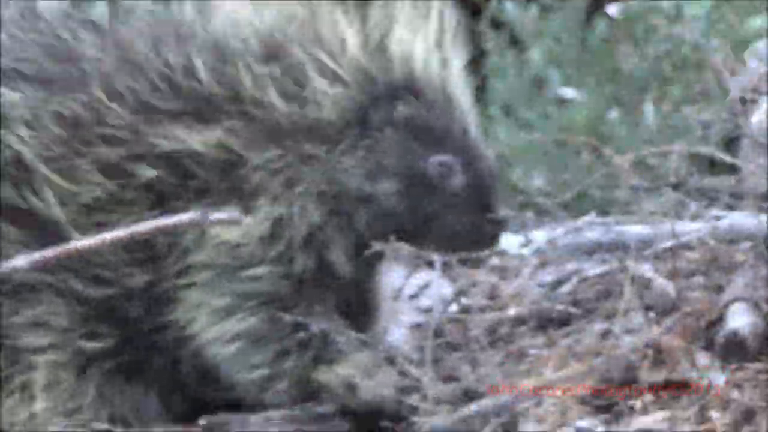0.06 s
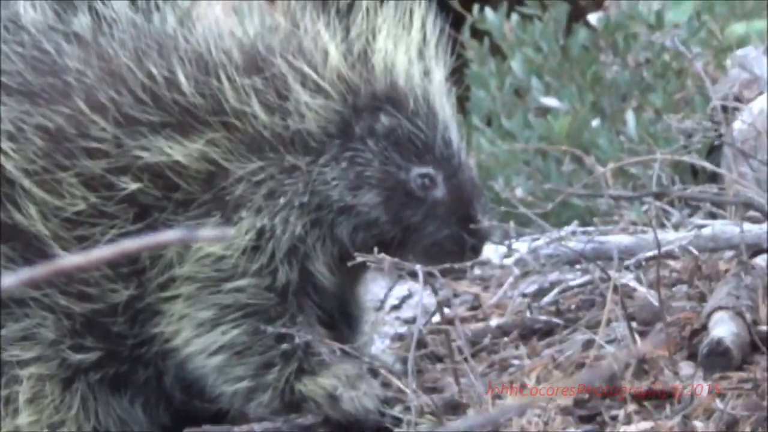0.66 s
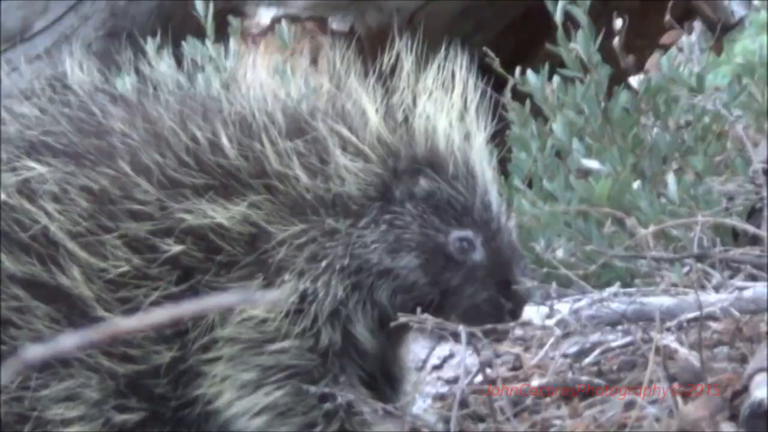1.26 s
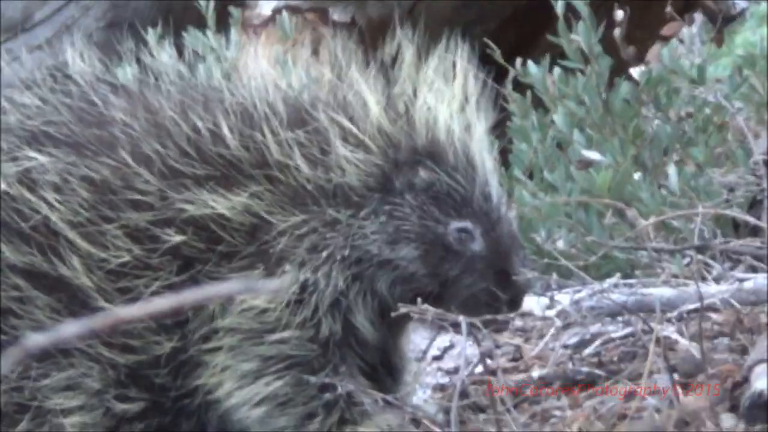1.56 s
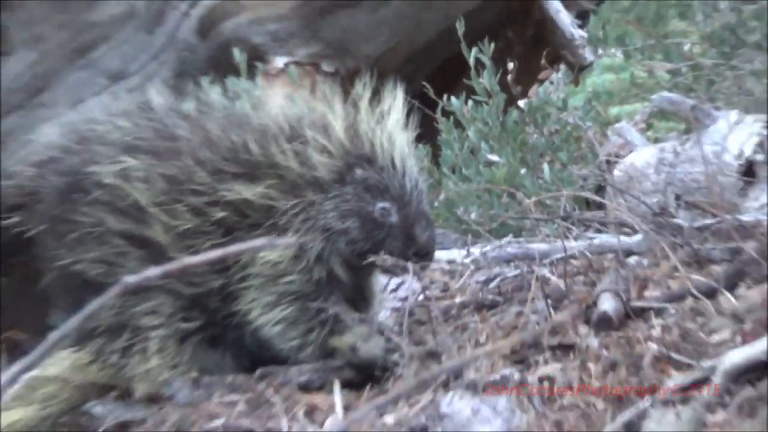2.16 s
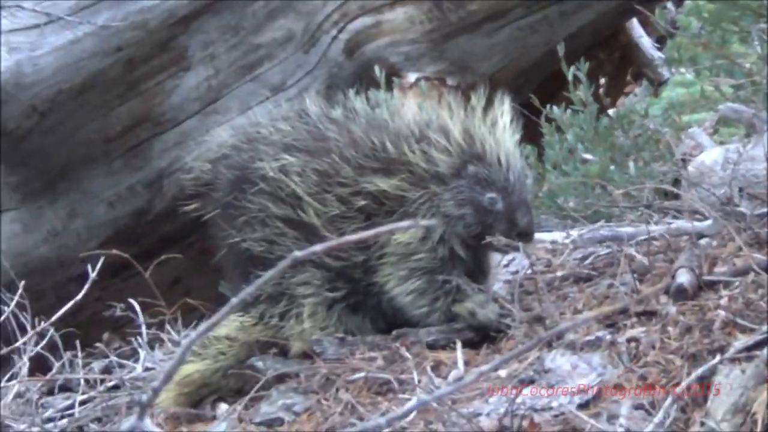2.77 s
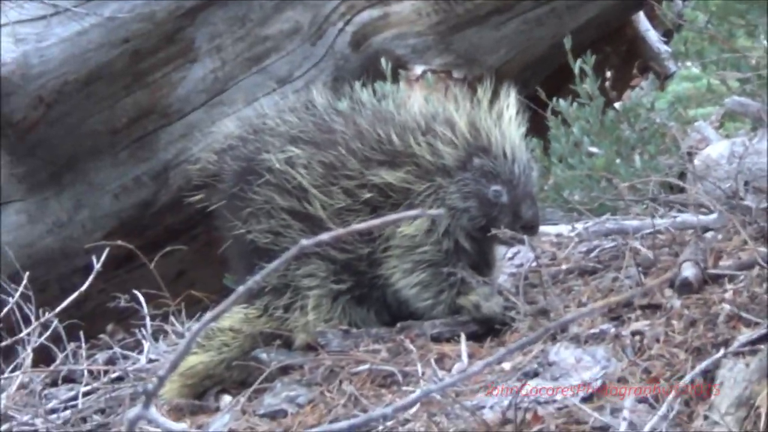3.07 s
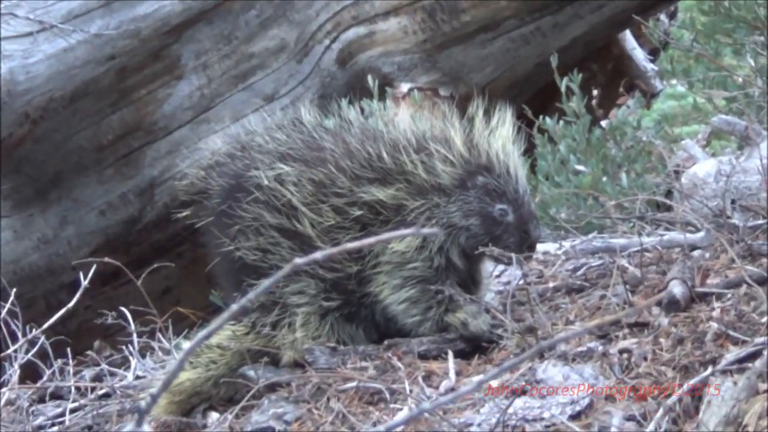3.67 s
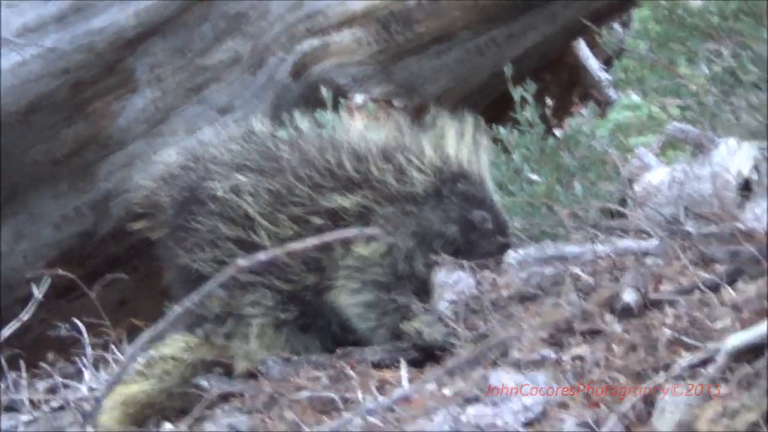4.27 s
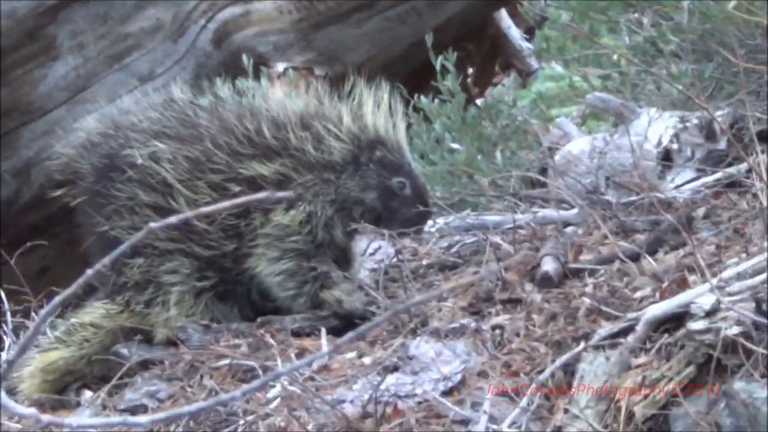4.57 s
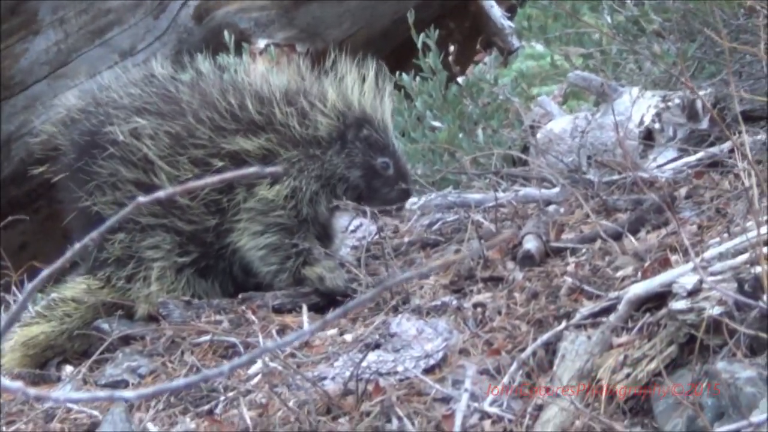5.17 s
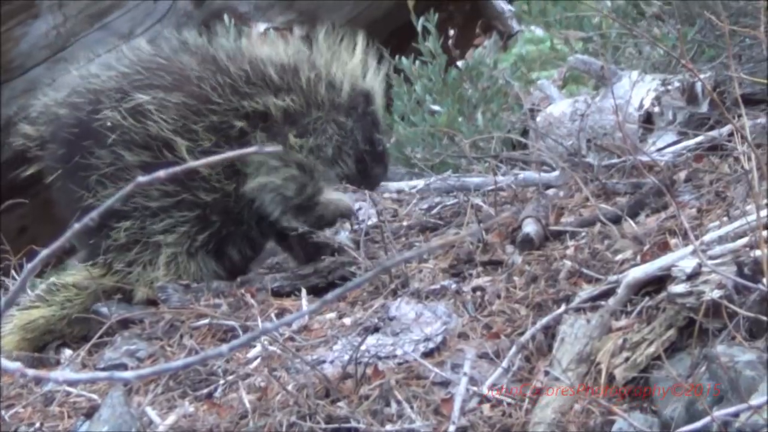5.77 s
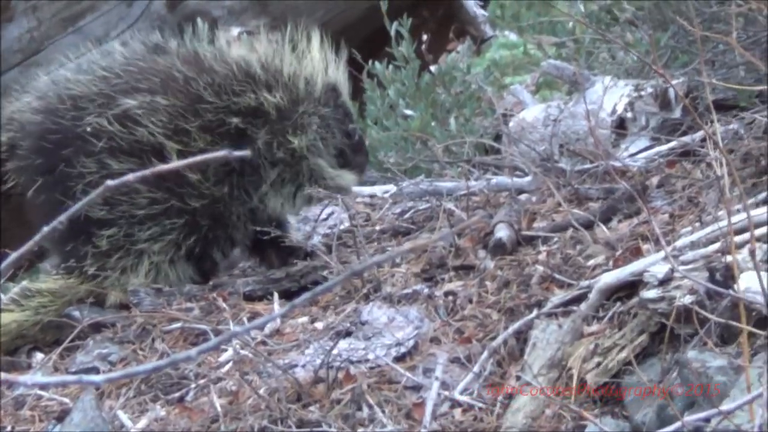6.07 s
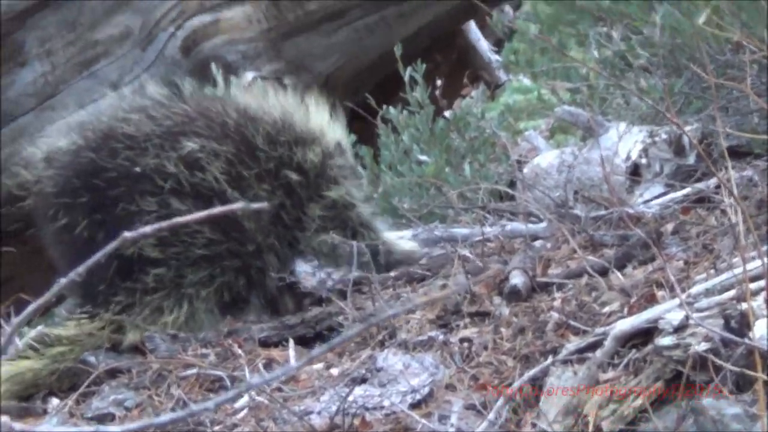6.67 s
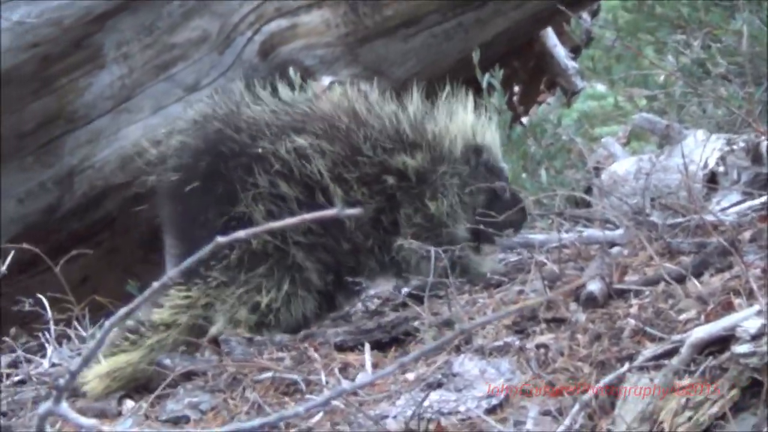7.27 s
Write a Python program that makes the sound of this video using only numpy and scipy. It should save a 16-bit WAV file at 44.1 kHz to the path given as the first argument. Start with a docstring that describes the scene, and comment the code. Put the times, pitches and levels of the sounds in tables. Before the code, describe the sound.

Steady wind in distant trees and a far-off idling engine, with a few faint twig snaps and rustles from a porcupine.

```python
"""A steady rush of wind through far trees, with the low hum and throb of an engine idling a long way off.
A porcupine sits on forest litter: one dry twig snaps at 2.2 s; near the end it shifts its feet,
needles crackle and a few more twigs tick, each a noise burst ringing in wood resonances.
A thin high whine pulses about 13 times a second.
The camera adds hiss; at about 1 s its sound cuts out for half a second."""
import sys
import numpy as np
from scipy import signal
from scipy.fft import irfft
from scipy.io import wavfile

SR = 44100
rng = np.random.default_rng(int(sys.argv[2]) if len(sys.argv) > 2 else 0)


def put_to_file(sound):
    """Save the sound as 16-bit audio at rate SR, in the file named by the first command-line argument."""
    columns = np.atleast_2d(sound).T  # one column per channel
    safe = np.clip(columns, -1, 1)
    whole_steps = np.round(safe * 32767)
    wavfile.write(sys.argv[1], SR, whole_steps.astype(np.int16))


N = 327663
TIME_S = np.arange(N) / SR
SIDES = np.array([[1], [-1]])  # left +, right -

# wind colour: freq_hz, relative_density_db
WIND_SPECTRUM = [(80, -30), (170, -5), (265, -5.5), (400, -3), (540, -1.5), (830, -0.95), (1030, -1.76),
                 (1500, -6), (2200, -10), (3200, -17), (4000, -22), (7400, -31.5), (8600, -38),
                 (10500, -83.5)]
# left-right likeness of the wind: freq_hz, coherence
WIND_COHERENCE = [(100, .997), (300, 0.96), (550, 0.93), (1000, 0.86), (2000, 0.79), (4000, 0.58),
                  (8000, 0.6)]
# wind balance: freq_hz, left_minus_right_db
WIND_BALANCE = [(100, -3), (250, 2), (550, 2.5), (900, 3.0), (1400, 4), (2400, 2.5), (4400, 1), (7500, 0)]
# wind phase between the channels: freq_hz, left_lead_rad
WIND_PHASE = [(100, -0.2), (300, -0.33), (750, -0.76), (1900, -0.99), (3000, -.8), (5000, -.45),
              (7500, -.1)]
# harmonics of the engine cycle: order, relative_level_db
ENGINE_HARMONICS = [(1, -22), (2, -28.5), (3, -7.5), (4, -10), (5, -0.5), (6, -11.5), (7, -13), (9, -15)]
# exhaust rumble colour: freq_hz, relative_density_db
RUMBLE_SPECTRUM = [(20, -27), (36, -23.5), (53, -7.5), (80, -6), (105, 3), (150, -2.5), (200, -6.5),
                   (300, -32.5), (1000, -93)]
# twigs snapping underfoot: start_s, force_db, pitch_hz
TWIG_SNAPS = [(2.216, -26, 3700), (5.779, -39, 10200), (6.502, -38, 9300), (6.558, -42, 10200),
              (6.686, -31, 10000), (6.7455, -30, 9300), (7.089, -39, 10000)]
# dry twig resonances: pitch_ratio, relative_bandwidth, gain_db
TWIG_MODES = [(.82, .13, 0), (.96, 0.15, 2.5), (1.12, .11, 3), (1.27, .1, -8)]
# feet dragging through needles: crest_s, sigma_s, force_db
FOOT_DRAGS = [(6.38, .035, -47.5), (6.76, .04, -53), (7.16, .04, -52)]
# preamplifier hiss colour: freq_hz, relative_density_db
HISS_SPECTRUM = [(3000, -8), (6000, -10.5), (8700, 4), (10500, 1.5), (13000, -2), (16000, -3)]
# tones of the high whine, line scan strongest: freq_hz, relative_level_db
WHINE_TONES = [(7882, -21), (15554.4, -23), (15614.4, -19), (15674.4, -21), (15734.3, 0)]


def wind(level_db=-26, gust_db=.7, flutter_db=.4, sough_gain=.35):
    """Far trees rush, with a faint sough and one mild gust; the two microphone ports differ slightly."""
    coherence = np.clip(over_hz(WIND_COHERENCE), 0, 1)  # long waves match at both ports
    field = np.sqrt(1 + coherence) * white_spectrum() + SIDES * np.sqrt(1 - coherence) * white_spectrum()
    balance = from_db(SIDES * over_hz(WIND_BALANCE) / 2)
    phase_shift = np.exp(.5j * SIDES * over_hz(WIND_PHASE))
    rush = irfft(field * balance * phase_shift * from_db(over_hz(WIND_SPECTRUM)), N)
    rush = rush + sough_gain * resonate(rush, freq_hz=814, width_hz=32)
    gust = swell(crest_s=3.14, sigma_s=.28)
    envelope_db = level_db + gust_db * gust + flutter_db * drift(rate_hz=3.9)
    return rush / np.std(rush.mean(axis=0)) * from_db(envelope_db)


def engine(idle_hz=22.27, hunt_hz=.09, hum_db=-35.5, waver_db=.4, rumble_db=-39, throb_depth=.45):
    """A hunting idle over a dull rumble. Only low orders carry this far; moving air makes each waver."""
    cycle_rad = 2 * np.pi * np.cumsum(idle_hz + hunt_hz * drift(rate_hz=.8)) / SR
    hum = 0
    for order, level_db in ENGINE_HARMONICS:
        gain = from_db(level_db + waver_db * drift(rate_hz=4.9))
        hum += gain * np.sin(round(order) * cycle_rad + rng.uniform(0, 2 * np.pi))
    exhaust_puffs = 1 + throb_depth * np.sin(cycle_rad)
    rumble = unit_rms(coloured_noise(RUMBLE_SPECTRUM) * exhaust_puffs)
    return from_db(hum_db) * np.sqrt(2) * hum + from_db(rumble_db) * rumble


def twig_snaps(crack_t60_s=.014, scatter_t60_s=.06, scatter_db=-14):
    """Each snap is a burst of tearing fibres with a short scatter off the ground."""
    out = np.zeros(N)
    age_s = np.arange(SR // 10) / SR
    for start_s, force_db, pitch_hz in TWIG_SNAPS:
        crack = from_db(-60 * age_s / crack_t60_s)
        scatter = from_db(scatter_db - 60 * age_s / scatter_t60_s)
        force = from_db(force_db) * (crack + scatter) * rng.standard_normal(len(age_s))
        start = round(start_s * SR)
        out[start:start + len(age_s)] += twig_ring(force, pitch_hz)
    return out


def foot_drags(grains_per_s=1500, needle_hz=9200):
    """A foot dragging through needles sets off a swell of fine, dense crackles."""
    drag = sum(from_db(force_db) * swell(crest_s, sigma_s) for crest_s, sigma_s, force_db in FOOT_DRAGS)
    hits = rng.random(N) < grains_per_s / SR
    grains = unit_rms(hits * rng.standard_normal(N))
    return twig_ring(drag * grains, needle_hz)


def twig_ring(force, pitch_hz):
    """Short, bright ring of dry wood; thicker pieces ring lower and longer."""
    ring = 0
    for ratio, relative_bandwidth, gain_db in TWIG_MODES:
        mode_hz = ratio * pitch_hz
        ring += from_db(gain_db) * resonate(force + 1e-18, mode_hz, relative_bandwidth * mode_hz)
    return ring


def camera_hiss(level_db=-50.5, side_db=-24):
    """Preamplifier hiss, nearly the same in both channels."""
    hiss = coloured_noise(HISS_SPECTRUM) + SIDES * from_db(side_db) * coloured_noise(HISS_SPECTRUM)
    return from_db(level_db) * hiss


def whine(level_db=-53.8, pulse_hz=13.1, pulse_depth=.4):
    """A thin high whine that pulses about 13 times a second."""
    tones = sum(from_db(tone_db) * np.sqrt(2) * np.sin(2 * np.pi * freq_hz * TIME_S)
                for freq_hz, tone_db in WHINE_TONES)
    pulse = 1 + pulse_depth * np.sin(2 * np.pi * pulse_hz * TIME_S)
    return from_db(level_db) * pulse * tones


def dropout(cut_s=.9905, blip_s=1.4735, blip_length_s=.009, return_s=1.484, fade_s=.023, switch_s=.0005):
    """Camera gain: switched off, on for a blip, then faded back in."""
    blip = ramp(blip_s, switch_s) - ramp(blip_s + blip_length_s, switch_s)
    return 1 - ramp(cut_s, switch_s) + blip + ramp(return_s, fade_s)


def from_db(db):
    """Decibels to gain."""
    return 10 ** (np.asarray(db) / 20)


def unit_rms(x):
    """Scale to rms 1."""
    return x / np.sqrt(np.mean(x ** 2) + 1e-20)


def over_hz(table):
    """Rows of (freq_hz, value) interpolated to every FFT bin on a log axis."""
    freq_hz, value = np.transpose(table)
    return np.interp(np.log(np.fft.rfftfreq(N, 1 / SR) + 1), np.log(freq_hz + 1), value)


def white_spectrum():
    """Spectrum of fresh white noise."""
    return rng.standard_normal(N // 2 + 1) + 1j * rng.standard_normal(N // 2 + 1)


def coloured_noise(spectrum):
    """Noise of a given colour; rms 1."""
    return unit_rms(irfft(white_spectrum() * from_db(over_hz(spectrum)), N))


def drift(rate_hz):
    """Slow random wander; rms 1."""
    hop, settle_steps = 40, 2000
    pole = np.exp(-2 * np.pi * rate_hz * hop / SR)
    noise = rng.standard_normal(N // hop + settle_steps + 2)
    slow = signal.lfilter([1], [1, -2 * pole, pole * pole], noise)[settle_steps:]
    return np.interp(np.arange(N) / hop, np.arange(len(slow)), unit_rms(slow))


def resonate(x, freq_hz, width_hz):
    """One resonance; peak gain 1."""
    radius = np.exp(-np.pi * width_hz / SR)
    feedback = [1, -2 * radius * np.cos(2 * np.pi * freq_hz / SR), radius ** 2]
    return signal.lfilter(np.array([1, 0, -1]) * (1 - radius ** 2) / 2, feedback, x)


def swell(crest_s, sigma_s):
    """Gaussian rise and fall; peak 1."""
    return np.exp(-.5 * ((TIME_S - crest_s) / sigma_s) ** 2)


def ramp(start_s, length_s):
    """Linear rise from 0 to 1, then hold."""
    return np.clip((TIME_S - start_s) / length_s, 0, 1)


def scene(engine_pan_db=1.24, engine_lag_s=.00015):
    """Wind and engine are a little louder and later on the left; the animal is straight ahead."""
    idle = engine()
    left = from_db(engine_pan_db / 2) * np.interp(TIME_S - engine_lag_s, TIME_S, idle)
    right = from_db(-engine_pan_db / 2) * idle
    return wind() + np.array([left, right]) + twig_snaps() + foot_drags() + camera_hiss() + whine()


def record(dry):
    """One dropout, then a steep low-pass."""
    cutoff_hz = 16000
    low_pass = signal.ellip(12, .1, 80, cutoff_hz, fs=SR, output="sos")
    return signal.sosfilt(low_pass, dry * dropout())


dry = scene()
out = record(dry)
put_to_file(out)
```